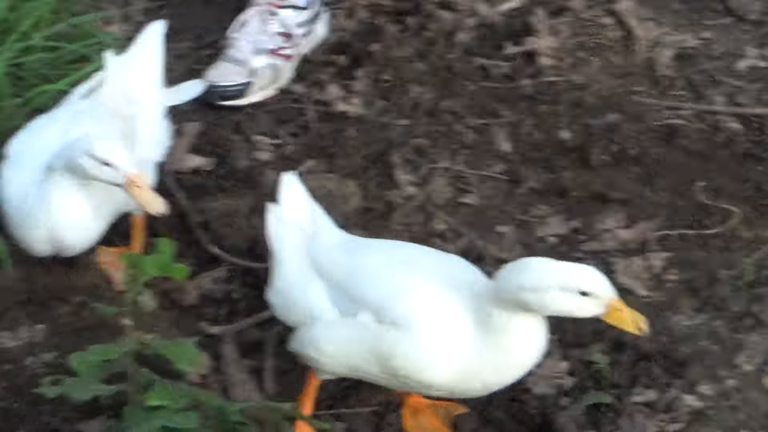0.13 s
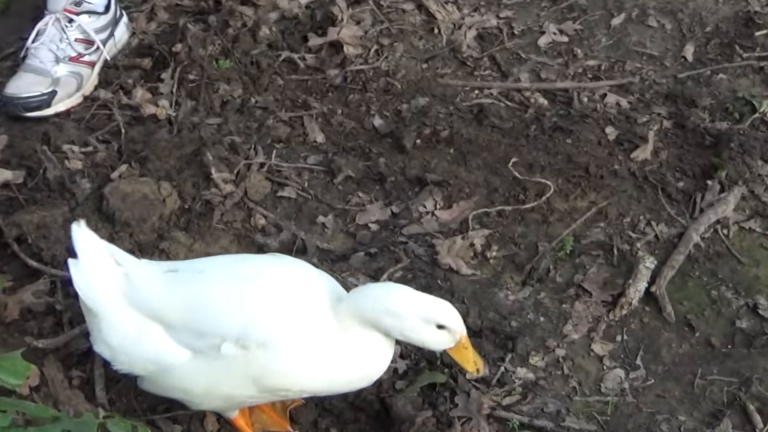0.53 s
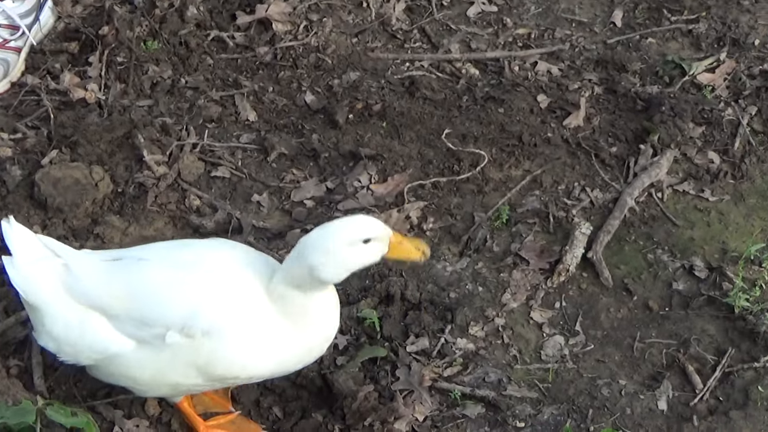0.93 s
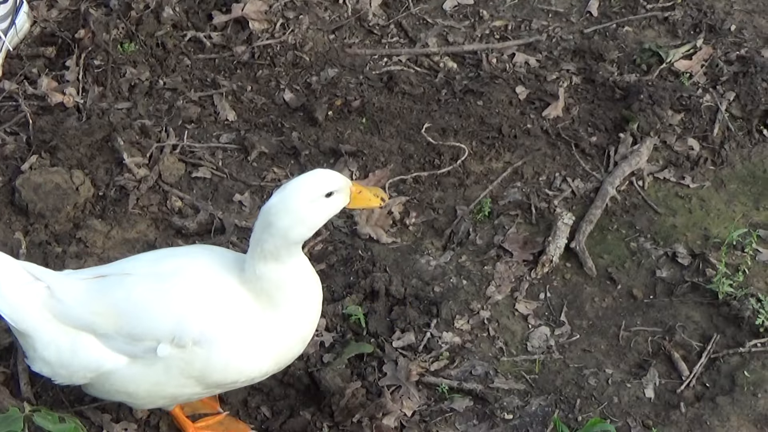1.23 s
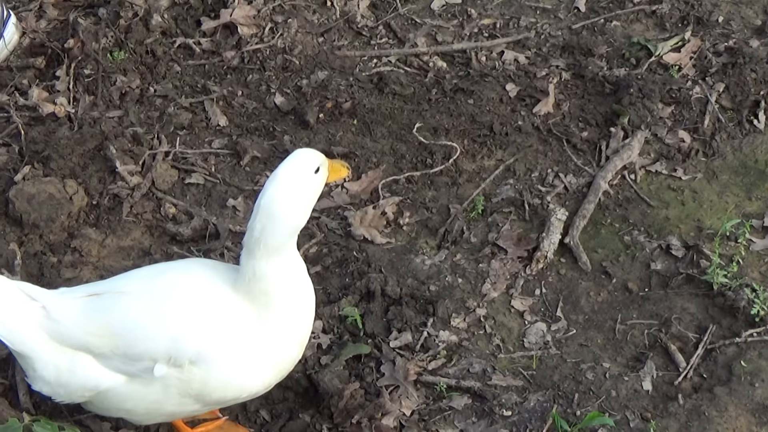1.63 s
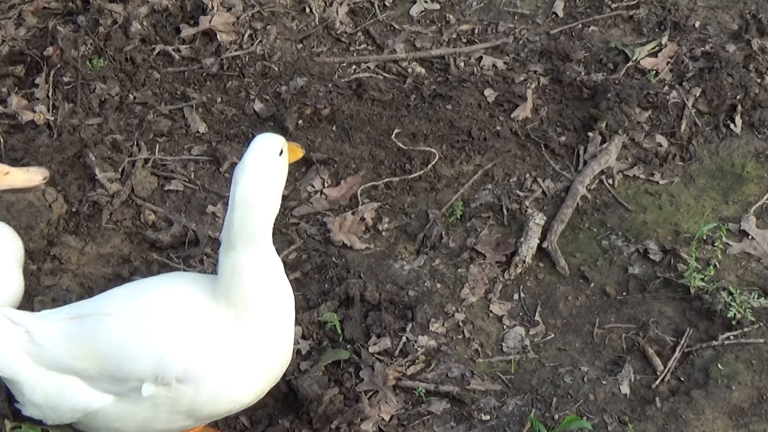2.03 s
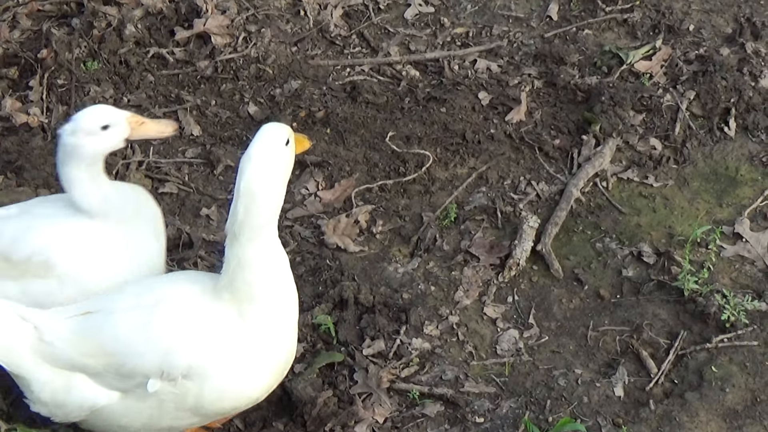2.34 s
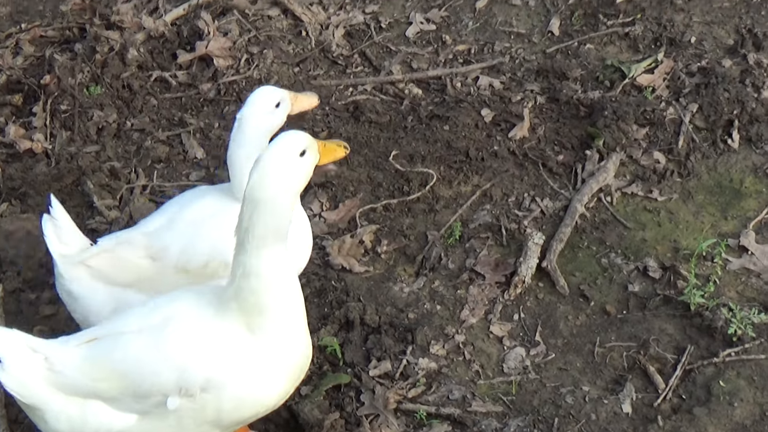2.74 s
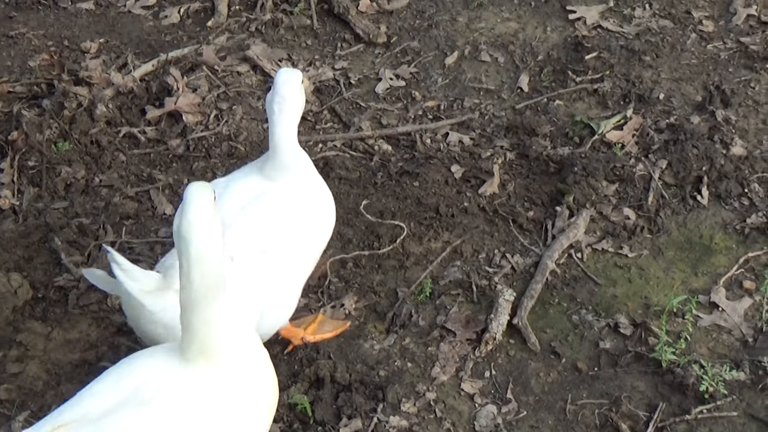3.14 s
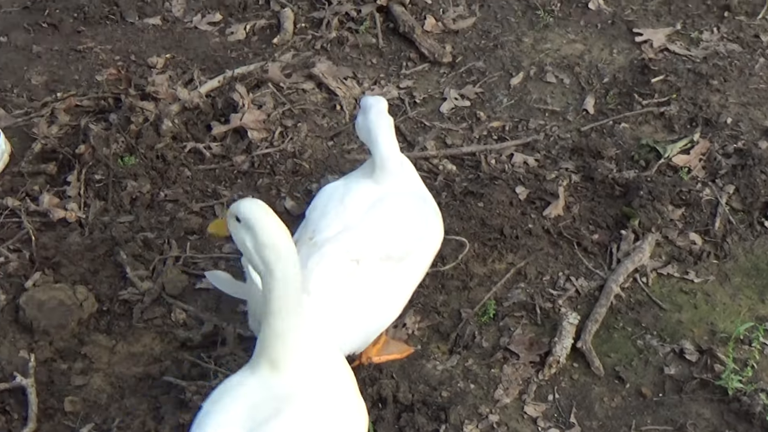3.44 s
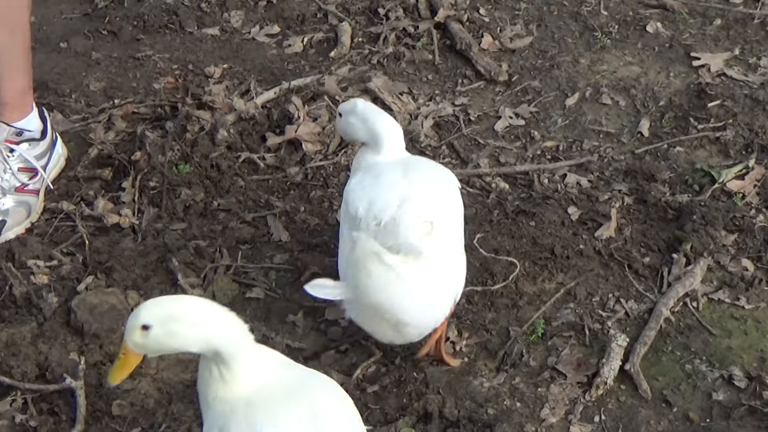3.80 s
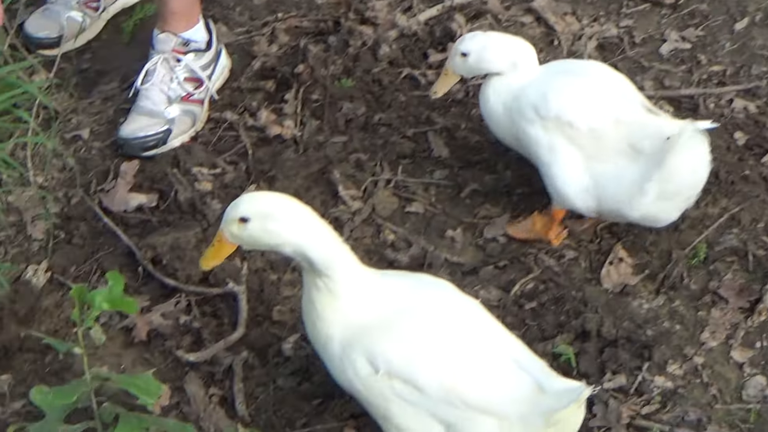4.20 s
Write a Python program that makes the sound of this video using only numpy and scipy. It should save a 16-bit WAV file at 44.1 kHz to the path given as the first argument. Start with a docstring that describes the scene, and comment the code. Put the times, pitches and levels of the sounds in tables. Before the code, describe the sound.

Quiet outdoor air with distant traffic and a faint low motor hum runs throughout. At first there is only a slight dry leaf rustle, a few small snaps, and barely audible chirrups around 0.4-0.5 s. From about 1.7 s a hen gives soft low clucks and thin gliding squeaks. A drake's hoarse, breathy rasps, each well under a tenth of a second, come at 2.0 and 2.2, 2.55 and 2.8, 3.15 and 3.35 s. The hen's single short nasal honk falls at 2.5 s, sagging in pitch. Another squeak rises then drops near 3.1 s. Stronger rasps sound at 3.95 and 4.2 s as leaf shuffling grows; bright crackles peak around 4.45 s, with more bursts at 4.8 and 5.1-5.4 s. A faint hollow murmur of noise passes at 4.9 s. A last rasp at 5.4 s, then the rustle thins. Close, bright stereo, with small dull echoes.

```python
"""First a faint rustle of dry leaves in a yard, over quiet air and a far motor's hum; then two ducks, foraging.
The drake's hoarse rasps are slaps and noise puffs ringing a windpipe; the hen's clucks and one honk are pulses
in her throat, her squeaks gliding near sines. Feet and beaks rustle and snap leaves in bursts of tiny grains,
mostly louder later on. A close pair of small microphones hears it, with dull echoes from fence and wall."""
import sys
import numpy as np
from scipy import signal
from scipy.io import wavfile

SR = 44100
rng = np.random.default_rng(int(sys.argv[2]) if len(sys.argv) > 2 else 0)


def file_out(sig):
    """Save sig as 16-bit WAV at sys.argv[1]."""
    # one column per channel
    cols = np.atleast_2d(sig).T
    # limit, then scale
    lim = np.clip(cols, -1, 1)
    pcm = np.round(lim * 32767).astype(np.int16)
    wavfile.write(sys.argv[1], SR, pcm)


def gain_from_db(level_db):
    """Turn a decibel level (scalar or array-like) into a linear amplitude factor."""
    decades = np.asarray(level_db, float) / 20
    return 10 ** decades


N = 253575

# drake's calls: first puff t/s, last puff t/s, level/dB, beak opening [0-1], windpipe tuning [ratio]
DRAKE_RASPS = [(1.975, 2.016, -13, 0.45, 1.07), (2.184, 2.247, -14, 0.51, 1.028),
               (2.555, 2.619, -10.5, 0.35, 0.997), (2.789, 2.86, -10, 0.38, 1.02),
               (3.16, 3.219, -14, 0.59, 0.99), (3.365, 3.429, -13.5, 0.57, 0.99),
               (3.955, 4.01, -9, 0.33, 1.034), (4.167, 4.221, -7.5, 0.3, 1.05),
               (5.415, 5.457, -11.5, 0.62, 0.99)]
# drake's windpipe resonances: untuned f/Hz, width of each of two passes/Hz, level/dB, gain with beak opening/dB
WINDPIPE = [(1359.5, 140, 0, -19.5), (1602, 194, -4.5, 1.5), (2109, 185, -10, 23), (2638, 158, -30, 47.5),
            (3284, 490, -22, 22), (4550, 93, -40, 22), (5500, 1200, -27, 23.5)]


def drake(breathy=0.085, puff_ms=7.0, sweep_ms_per_octave=7.0, jitter_ms=0.8):
    """The membranes slap some 80 times a second, slowing; each slap is a tick and a noise puff in the windpipe."""
    puffs_per_s = 80
    out, noise = np.zeros(N), rng.standard_normal(N)
    lowest_hz = WINDPIPE[0][0]
    for first, last, level_db, beak, tuning in DRAKE_RASPS:
        along = np.linspace(0, 1, round((last - first) * puffs_per_s) + 1)
        slap_s = first + (last - first) * along ** 1.07
        chest_db = -4.5 + 10.5 * beak   # strength below 1.8 kHz grows with the effort that opens the beak
        swell = np.sin(np.pi * (0.11 + 0.77 * along)) ** 0.88
        opening = beak * np.sin(np.pi * (0.25 + 0.76 * along))   # the beak shuts before the call ends
        span = slice(round((first - 0.01) * SR), round((last + 0.06) * SR))
        for hz, width, mode_db, open_db in WINDPIPE:
            size_db = level_db + mode_db + open_db * opening + chest_db * (hz < 1800)
            size = gain_from_db(size_db + rng.normal(0, 2, len(along))) * swell
            # each puff sweeps upward: the higher resonances speak later
            lag_ms = sweep_ms_per_octave * min(np.log2(hz / lowest_hz), 1)
            lag_ms = lag_ms + rng.normal(-4.0, jitter_ms, len(along))
            slaps = clicks(slap_s + lag_ms / 1000, size)[span]
            puffs = smear(slaps, puff_ms)[:len(slaps)] * noise[span]
            once = ring(slaps + breathy * puffs, hz * tuning, width)
            twice = ring(once, hz * tuning, width)   # steep skirts
            out[span] += twice * 6 * width / SR
    return signal.sosfilt(signal.butter(4, 1150, "high", fs=SR, output="sos"), out)


# hen's throat, beak open: f/Hz, width/Hz, level/dB
THROAT_OPEN = [(238, 76, -12.5), (700, 130, -1), (1406, 260, 6), (2160, 65, -11), (2960, 1600, -5.5),
               (3820, 54, -25), (4520, 100, -19), (5160, 22, -27.5), (6130, 150, -27), (9600, 2100, -13)]
# hen's throat, beak shut: f/Hz, width/Hz, level/dB
THROAT_SHUT = [(201, 290, 2.5), (637, 123, -1), (950, 210, 2), (1500, 230, -2.5), (2700, 990, -6)]
# hen's clucks: pulse t/s, pulse level into the throat/dB
HEN_CLUCKS = [(1.666, -43), (1.823, -38), (1.834, -34), (1.897, -40.5), (1.973, -34.5), (2.172, -42),
              (2.376, -31.5), (2.382, -32), (2.387, -47), (3.051, -35.5), (3.155, -35.5), (3.161, -36),
              (3.211, -36), (3.316, -37.5), (3.354, -42.5), (4.154, -36.5), (4.39, -27.5), (5.023, -26.5),
              (5.416, -28)]


def hen(jitter=0.007, uneven_db=2, rough=0.036):
    """A honk is a steady run of pulses sagging in pitch, a cluck lone pulses with the beak shut."""
    start_s, length_s, level_db, swell_db = 2.491, 0.049, -15, 2
    rise_s, release_s = 0.006, 0.0072   # time to rise or fall 20 dB
    tail_db, tail_s = -35, 0.022   # a weak flutter trails
    start_hz, rest_hz, sag_s = 279, 194.8, 0.019
    opening_db = 9   # scale of the treble's rise and fall as the beak opens and shuts
    since = np.arange(N) / SR - start_s
    along = np.clip(since / length_s, 0, 1)
    end_s = start_s + length_s

    hz = rest_hz + (start_hz - rest_hz) * np.exp(-np.maximum(since, 0) / sag_s)
    swelling_db = swell_db * np.sin(2.7 * along) ** 2
    level = gain_from_db(level_db + swelling_db + tent_db(start_s, end_s, rise_s, release_s))
    level += gain_from_db(tail_db + tent_db(end_s, end_s + tail_s, 0.003, 0.003))
    cycles = np.cumsum(hz * (1 + jitter * drift(150))) / SR
    pulses = np.diff(np.floor(cycles), prepend=0)   # one pulse a cycle
    pulses = pulses * gain_from_db(uneven_db * rng.standard_normal(N))
    honk = level * (pulses + rough * smear(pulses, 5.2) * rng.standard_normal(N))
    treble = gain_from_db(opening_db * (np.sin(np.pi * along ** 0.85) - 0.78))

    out = np.zeros(N)
    for k, (hz, width, db) in enumerate(THROAT_OPEN):
        # the two lowest resonances share a sign, which hollows out the second harmonic
        sign = (-1) ** max(k - 1, 0)
        drive = honk * treble if hz > 1800 else honk
        drive = np.roll(drive, 9 * k)   # higher ones speak a little later
        out += sign * gain_from_db(db) * ring(drive, hz, width)
    cluck_s, cluck_db = np.transpose(HEN_CLUCKS)
    cluck = clicks(cluck_s, gain_from_db(cluck_db))
    out += sum(gain_from_db(db) * ring(cluck, hz, width) for hz, width, db in THROAT_SHUT)
    return signal.sosfilt(signal.butter(2, 150, "high", fs=SR, output="sos"), out)


# hen's squeaks: start t/s, end t/s, first f/Hz, last f/Hz, level at the end/dB
HEN_SQUEAKS = [(1.699, 1.745, 1350, 1300, -53), (1.751, 1.798, 1182, 1133, -40),
               (1.802, 1.826, 1135, 700, -43), (1.912, 1.968, 1090, 1296, -45),
               (1.927, 1.968, 2150, 2050, -46), (1.969, 2.005, 1034, 734, -40.5),
               (2.42, 2.458, 1320, 1200, -48), (2.455, 2.49, 2190, 2010, -39),
               (2.463, 2.488, 3260, 3130, -46), (3.061, 3.182, 903, 1100, -41),
               (3.18, 3.218, 1100, 678, -43.5)]
# what the beak favours: f of the octave/Hz, its level against the note/dB
OCTAVE_COLOUR = [(1400, -5), (2050, -11.5), (2320, 2), (2600, -7.5), (4200, -24)]


def squeaks():
    """Air whistles past the tight membranes: near sines gliding with the breath; the beak favours some octaves."""
    swell_db, swell_db_per_octave = 11, 24   # held notes swell, rising ones more, steeply falling ones fade
    overshoot = 0.95   # a rising note arches above its path, scaled by this share of the rise
    octave_follows, effort_db = 0.6, -44.5   # the octave gains this share of each dB above that effort
    out, waver, t = np.zeros(N), 1 + 0.0062 * drift(77), np.arange(N) / SR
    for start, end, first_hz, last_hz, end_db in HEN_SQUEAKS:
        along = np.clip((t - start) / (end - start), 0, 1)
        rise_hz = last_hz - first_hz
        arch_hz = overshoot * max(rise_hz, 0) * np.sin(np.pi * along ** 0.81)
        hz = first_hz + rise_hz * along + arch_hz
        total_swell_db = swell_db + swell_db_per_octave * np.log2(last_hz / first_hz)
        level_db = end_db - (1 - along) * total_swell_db
        gate = np.clip(np.minimum(t - start, end - t) / 0.006 + 0.5, 0, 1)
        phase = 2 * np.pi * np.cumsum(hz * waver) / SR
        octave_db = at_hz(OCTAVE_COLOUR, 2 * hz) + octave_follows * (level_db - effort_db)
        overtones = gain_from_db(octave_db) * (np.sin(2 * phase) + 0.065 * np.sin(3 * phase))
        out += np.sqrt(2) * gate * gain_from_db(level_db) * (np.sin(phase) + overtones)
    # one faint high whistle dies away afterwards
    whistle_s, whistle_hz, whistle_db, whistle_t60_s = 2.6, 3360, -49, 0.47
    fading_db = whistle_db + tent_db(whistle_s, whistle_s, 0.004, whistle_t60_s / 3)
    out += np.sqrt(2) * gain_from_db(fading_db) * np.sin(2 * np.pi * whistle_hz * np.cumsum(waver) / SR)
    return out * gain_from_db(2.5 * drift(120))


# density of the leaf noise: f/Hz, relative level per Hz/dB
LEAF_SPECTRUM = [(80, -22.5), (200, -14.5), (500, -11), (1000, -10.5), (2000, -5.5), (4000, -7.5),
                 (7000, -8), (14000, -10.5)]


def rustle(per_s=4000, crunch_per_s=90, crunch_ms=3.2, smooth=0.82):
    """Dry leaves break in tiny grains; crunches of a few milliseconds start sharply and stand out of the hiss."""
    level_db, low_db = leaf_motion()
    starts = rng.random((2, 1, N)) < crunch_per_s / SR
    starts = starts * gain_from_db(2.8 * np.minimum(rng.exponential(1, (2, 1, N)), 2.6))
    starts = starts + 1.56 * starts[::-1]   # a crunch colours alternate bands unevenly
    decay = np.exp(-1000 / (crunch_ms * SR))
    crunch = 1 + 0.32 * signal.lfilter([1], [1, -decay], starts)
    born = rng.random((2, 2, N)) < per_s / SR
    grain_size = gain_from_db(3.14 * np.minimum(rng.exponential(1, (2, 2, N)), 4))
    grains = born * grain_size * rng.choice([-1, 1], (2, 2, N))
    hiss = smooth * rng.standard_normal((2, 2, N))
    white = rms_one(crunch * (rms_one(grains) + hiss))
    leaves = banded(white, LEAF_SPECTRUM, patchy_db=2.5, low_db=low_db)
    return pan(gain_from_db(level_db - 4.5) * leaves, 0.13)


# feet and beaks push through leaves: touch t/s, peak t/s, relative peak level/dB,
# time to fall 20 dB/s, level added below the crisp band/dB
LEAF_SHUFFLES = [(0, 0.008, -53.5, 0.2, 5.5), (0.18, 0.238, -46, 0.32, 2.5), (1.937, 1.964, -43.5, 0.37, 4),
                 (2.246, 2.29, -47, .5, 3.5), (2.484, 2.61, -51.5, 0.55, 16.5),
                 (3.136, 3.141, -42.5, 0.2, 6.5), (3.296, 3.326, -51, 0.5, 9.5),
                 (3.377, 3.424, -35, 0.11, 1), (3.534, 3.587, -49, 0.27, 2.5), (3.796, 3.877, -35, 1, 3.5),
                 (3.948, 3.983, -24, 0.1441, 3), (4.135, 4.326, -32, 0.48, 1),
                 (4.355, 4.54, -22, 0.11, 0.5), (4.65, 4.833, -26.5, 0.29, 2.5),
                 (5.082, 5.146, -24.5, 0.21, 3.5), (5.164, 5.207, -22, 0.23, -0.5),
                 (5.26, 5.322, -32, 0.27, 2.5), (5.447, 5.496, -43.5, 0.14, 8)]
# idle stirring: t/s, relative level/dB
IDLE_STIR = [(0, -65.5), (0.6, -59), (1.3, -68.5), (1.9, -59), (3.05, -72), (3.7, -58.5), (5.75, -53.5)]


def leaf_motion():
    """Shuffles add their power to the idle stirring; gives level dB and dullness dB."""
    stir_dull_db = 6.5
    touch_db, touch_s = -9, 0.017   # a shuffle starts fast this far under its peak, then builds
    crisp = gain_from_db(2 * in_time(IDLE_STIR)[0])
    dull, t = crisp * gain_from_db(2 * stir_dull_db), np.arange(N) / SR
    for touch, peak, peak_db, fall_s, dull_db in LEAF_SHUFFLES:
        build_db = np.interp(t, [touch, peak], [touch_db, 0])
        power = gain_from_db(2 * (peak_db + build_db + tent_db(touch, peak, touch_s, fall_s)))
        crisp = crisp + power
        dull = dull + power * gain_from_db(2 * dull_db)
    return 10 * np.log10(crisp), 10 * np.log10(dull / crisp)


# leaf snaps: t/s, relative peak level/dB, length (two decay constants)/ms
LEAF_SNAPS = [(0.3274, -23, 1.7), (0.921, -34.5, 1.4), (1.5647, -32.5, 2.4), (1.9375, -22, 5.5),
              (1.9719, -22.5, 4.9), (2.177, -16.5, 2.1), (2.2742, -27, 3), (2.663, -24.5, 3.3),
              (2.7356, -27, 2.1), (3.1365, -20, 1.3), (3.271, -30, 3.1), (3.3171, -23, 5.5),
              (3.4128, -15, 1.1), (3.6863, -30, 2.8), (3.7329, -39, 2.3), (3.7574, -39, 2.5),
              (3.795, -35, 2.5), (3.9658, -16, 2.3), (4.118, -23.5, 4.3), (4.335, -15, 3.6),
              (4.392, -17, 2.8), (4.4447, -11, 2.5), (4.4527, -1, 4.6), (4.4665, -5.5, 6),
              (4.9367, -18, 5.2), (5.09, -12, 2.9), (5.3372, -4.5, 0.71), (5.4055, -4.5, 0.7),
              (5.478, -14.5, 1.7), (5.69, -26, 2.7), (5.714, -24.5, 2.5)]


def snaps():
    """A leaf breaks: a few milliseconds of bright crackle."""
    out = np.zeros(N)
    for s, peak_db, ms in LEAF_SNAPS:
        burst = rng.standard_normal(900) * np.exp(-np.arange(900) / (ms * SR / 2000))
        burst[0] = 2   # the break itself
        burst = signal.lfilter([1, 0, -1], [1, -0.3], burst)
        i = round(s * SR)
        out[i:i + 900] += gain_from_db(peak_db - 6) * burst / np.abs(burst).max()
    return out


# faint short chirrups: start t/s, relative level/dB, f/Hz
FAINT_CHIRRUPS = [(0.3835, -39, 2720), (0.394, -47, 2680), (0.4214, -46, 2810), (0.4708, -46.5, 3140),
                  (0.5033, -46.5, 2830)]


def chirrups():
    """Short noisy notes, each a 27 ms puff in one resonance."""
    out, noise = np.zeros(N), rng.standard_normal(N)
    for s, level_db, hz in FAINT_CHIRRUPS:
        puff = smear(clicks([s], gain_from_db(level_db)), 27.0) * noise
        out += 0.1 * ring(puff, hz, 220)
    return out


# low resonances of the hollow sound: f/Hz, width of each of two passes/Hz, level/dB
HOLLOW_RESONANCES = [(252, 37, -2), (523, 130, 0.5), (825, 140, -2)]


def hollow():
    """Lumpy noise in three low resonances."""
    start_s, length_s, level_db, edge_s = 4.91, 0.14, -41.5, 0.051   # edge: time to rise or fall 20 dB
    noise, body = rng.standard_normal(N), np.zeros(N)
    for hz, width, db in HOLLOW_RESONANCES:
        body += gain_from_db(db) * rms_one(ring(ring(noise, hz, width), hz, width))
    shape_db = tent_db(start_s, start_s + length_s, edge_s, edge_s)
    return gain_from_db(level_db + 2.2 * drift(25) + shape_db) * body


# echo paths from fence and wall: lag t/s, level/dB, side [-1 right to 1 left]
ECHO_PATHS = [(.011, -16.5, 0.3), (0.025, -29, -0.6), (.041, -30, 0.23), (.067, -38, -.6), (.105, -40.5, 1)]


def fence_echoes(x):
    """A few dull, smeared echoes from fence and wall."""
    dull = signal.sosfilt(signal.butter(2, [500, 4000], "band", fs=SR, output="sos"), x)
    out = np.zeros((2, N))
    for lag, level_db, side in ECHO_PATHS:
        spread = rng.standard_normal(500) * np.hanning(500)
        path = np.r_[np.zeros(round(lag * SR)), spread / np.linalg.norm(spread)]
        out += gain_from_db(level_db) * signal.fftconvolve(dull, path)[:N] * [[1 + side], [1 - side]]
    return out


# lines of the far motor: f/Hz, mean level/dB rms
MOTOR_HUM = [(118.4, -69.5), (236.9, -64.5), (296.1, -62), (1470, -77.5)]
# density of the yard's air: f/Hz, relative level per Hz/dB
AIR_SPECTRUM = [(25, -21), (55, -6), (180, -5.5), (260, -3), (400, -10.5), (800, -7), (1400, -23),
                (4000, -26.5), (11000, -58), (15500, -25)]


def yard_air():
    """Far traffic and air hiss as banded noise, with the wavering lines of a motor."""
    t, hum = np.arange(N) / SR, np.zeros(N)
    for hz, db in MOTOR_HUM:
        level = np.sqrt(2) * gain_from_db(db + 2.4 * drift(2.7))
        hum += level * np.sin(2 * np.pi * hz * t + 0.5 * drift(4.5))
    air = banded(rng.standard_normal((2, 2, N)), AIR_SPECTRUM, patchy_db=3.0)
    return hum + gain_from_db(-61.5) * air


# how alike the two microphones hear noise: f/Hz, left-right likeness [0-1]
STEREO_LIKENESS = [(30, 0.995), (250, 0.92), (500, 0.82), (2000, 0.92), (9000, 1)]


def banded(white, spectrum, patchy_db, low_db=0):
    """Half-octave bands of mid and side, each with its level, flicker and likeness; low_db lifts the dull bands."""
    out, power, edges = 0, 0, 25 * 2 ** np.arange(0, 9.6, 0.5)
    for k, (low, high) in enumerate(zip(edges, edges[1:])):
        band = signal.butter(2, [low, high], "band", fs=SR, output="sos")
        mid, side = signal.sosfilt(band, white[k % 2])
        hz = np.sqrt(low * high)
        alike = np.clip(at_hz(STEREO_LIKENESS, hz), 0, 1)
        dull = np.clip(np.log2(8000 / hz) / 2, 0, 1)
        band_db = at_hz(spectrum, hz)
        gain = gain_from_db(band_db + patchy_db * drift(15.4) + dull * low_db)
        out = out + gain * (np.sqrt(1 + alike) * mid + np.sqrt(1 - alike) * side * [[1], [-1]])
        power += gain_from_db(2 * band_db) * (high - low) * 2 / SR
    return out / np.sqrt(power)


def rms_one(x):
    """Scales to an rms of 1."""
    return x / np.sqrt(np.mean(x ** 2) + 1e-20)


def in_time(rows):
    """Draws each column as a line through its times."""
    s, *columns = np.transpose(rows)
    return [np.interp(np.arange(N) / SR, s, c) for c in columns]


def at_hz(points, hz):
    """Reads a curve along log frequency."""
    curve_hz, values = np.transpose(points)
    return np.interp(np.log(hz), np.log(curve_hz), values)


def drift(rate):
    """Slow chance of spread 1, made at every 40th sample; a higher rate wanders faster."""
    r = np.exp(-80 * np.pi * rate / SR)
    slow = signal.lfilter([1], [1, -2 * r, r * r], rng.standard_normal(N // 40 + 2002))[2000:]
    return np.interp(np.arange(N) / 40, np.arange(len(slow)), rms_one(slow))


def ring(x, hz, width_hz):
    """A resonance: a unit click sets a decaying sine of starting height 1 ringing."""
    r, w = np.exp(-np.pi * width_hz / SR), 2 * np.pi * hz / SR
    return signal.lfilter([0, np.sin(w)], [1, -2 * r * np.cos(w), r * r], x + 1e-18)


def clicks(seconds, sizes):
    """Single-sample clicks at the given times."""
    out = np.zeros(N)
    at = np.round(np.asarray(seconds) * SR).astype(int)
    np.add.at(out, np.clip(at, 0, N - 1), sizes)
    return out


def smear(x, ms):
    """Every unit click becomes a smooth hump of height 1."""
    return signal.fftconvolve(x, np.hanning(max(int(ms * SR / 1000), 3)))[:N]


def tent_db(start, end, rise_s, fall_s):
    """0 dB from start to end, 20 dB down rise_s before and fall_s after."""
    t = np.arange(N) / SR
    return -20 * (np.maximum(start - t, 0) / rise_s + np.maximum(t - end, 0) / fall_s)


def pan(x, db):
    """Makes the left louder than the right by db."""
    return x * gain_from_db(np.array([[db / 2], [-db / 2]]))


def leading_left(x, hz, width_hz, share):
    """A sound off to the left reaches that port a quarter turn early around a resonance of the housing."""
    mid = x.mean(axis=0)
    side = 2 * np.pi * width_hz / SR * ring(mid, hz, width_hz)
    side = side - width_hz / hz * mid   # the bass stays centred
    return x - share * side * [[1], [-1]]


def scene():
    """Ducks and their echoes, leaves, small sounds and the yard behind."""
    ducks = pan(drake(), -0.48) + pan(hen(), -0.67) + pan(squeaks(), 1.2)
    ducks = leading_left(ducks, 1000, 450, share=0.18)
    small = snaps() + chirrups() + hollow()
    return ducks + fence_echoes(ducks.mean(axis=0)) + rustle() + pan(small, 0.1) + yard_air()


def low_pass(x):
    """Removes everything above the highest recorded frequency."""
    return signal.sosfilt(signal.butter(12, 16670, fs=SR, output="sos"), x)


def record(dry):
    """A close pair of small microphones whose ports resonate in the treble and cut above it."""
    port_hz, port_width_hz, port_db, top_hz = 9770, 2170, 8, 11380
    dry = leading_left(dry, 3840, 1080, share=0.22)
    b, a = signal.iirpeak(port_hz, port_hz / port_width_hz, fs=SR)
    heard = dry + gain_from_db(port_db) * signal.lfilter(b, a, dry)
    heard = signal.sosfilt(signal.butter(2, top_hz, fs=SR, output="sos"), heard)
    return low_pass(heard)


dry = scene()
out = record(dry)
file_out(out)
```